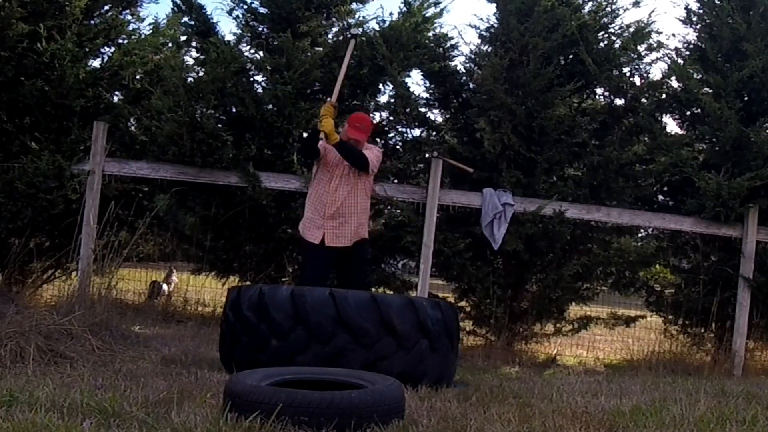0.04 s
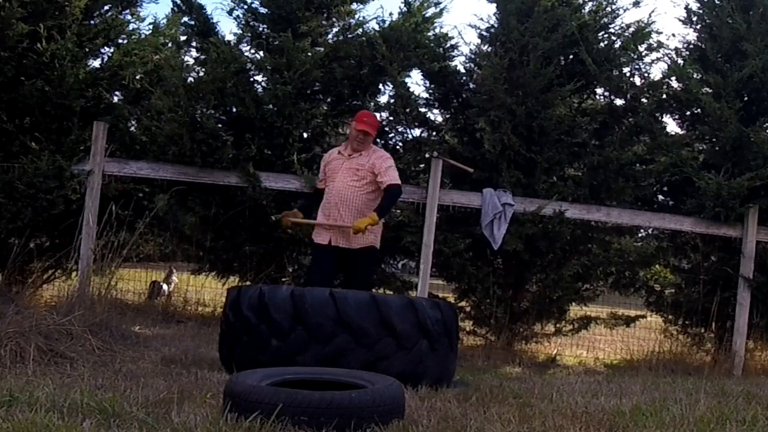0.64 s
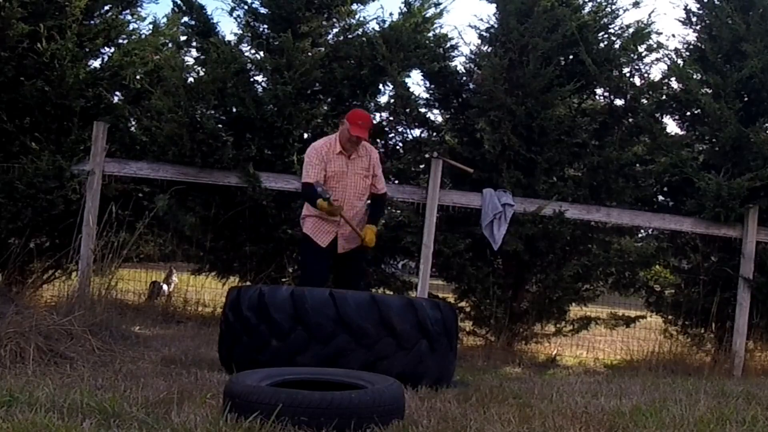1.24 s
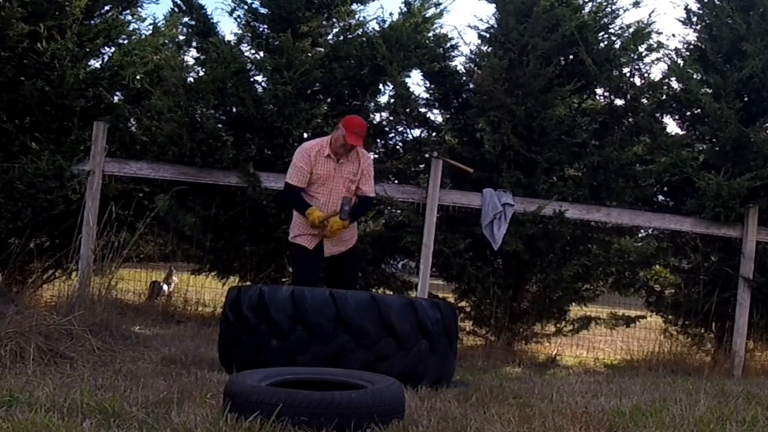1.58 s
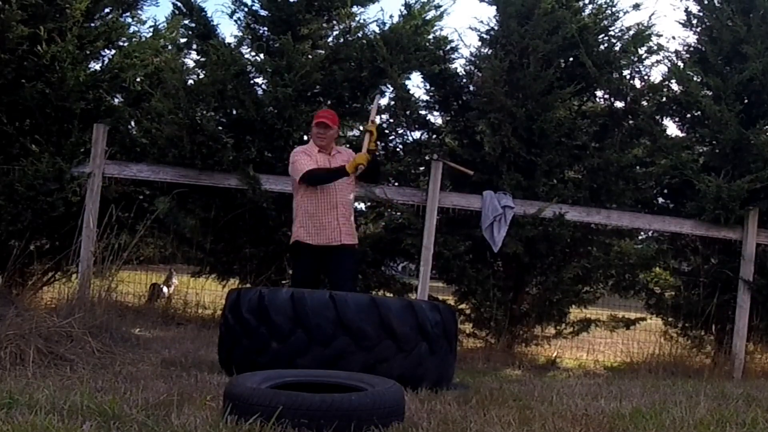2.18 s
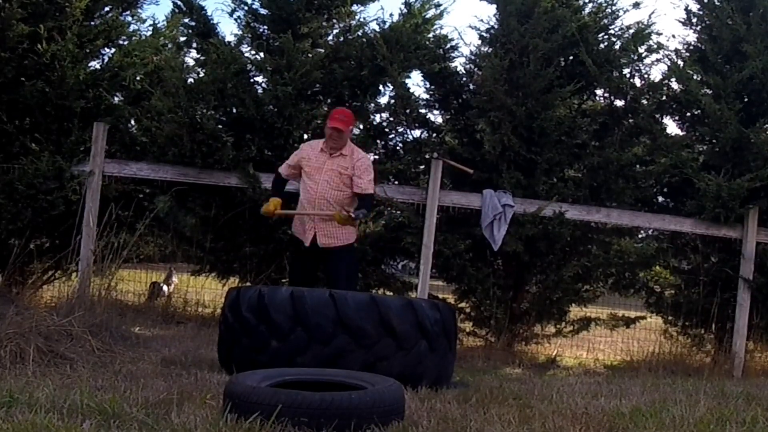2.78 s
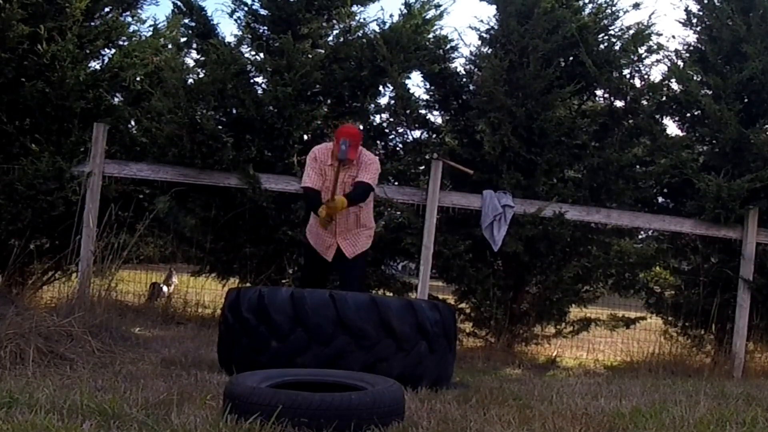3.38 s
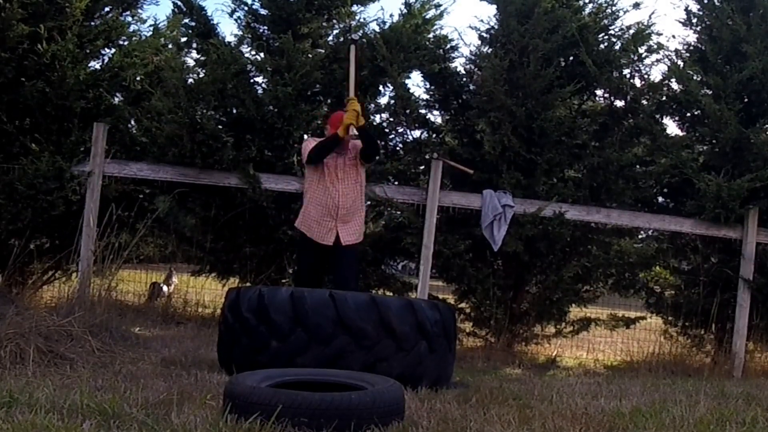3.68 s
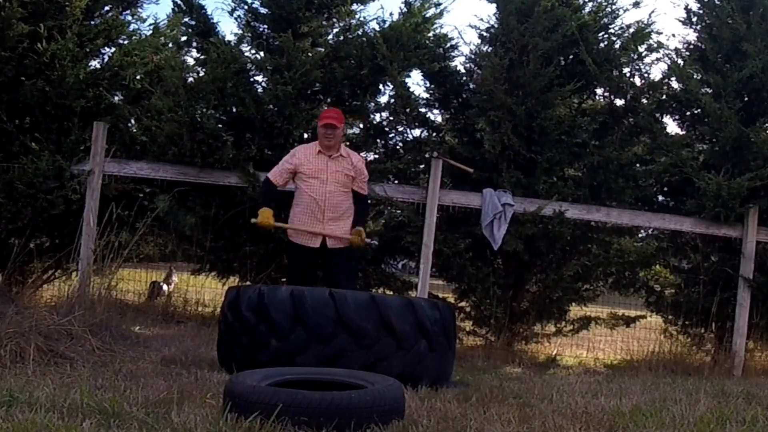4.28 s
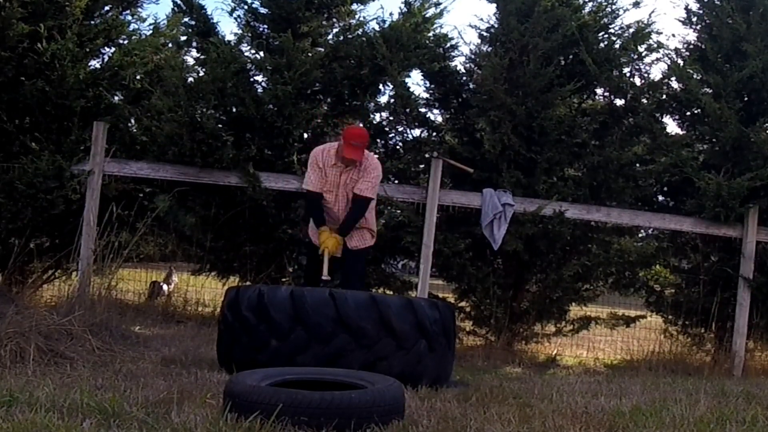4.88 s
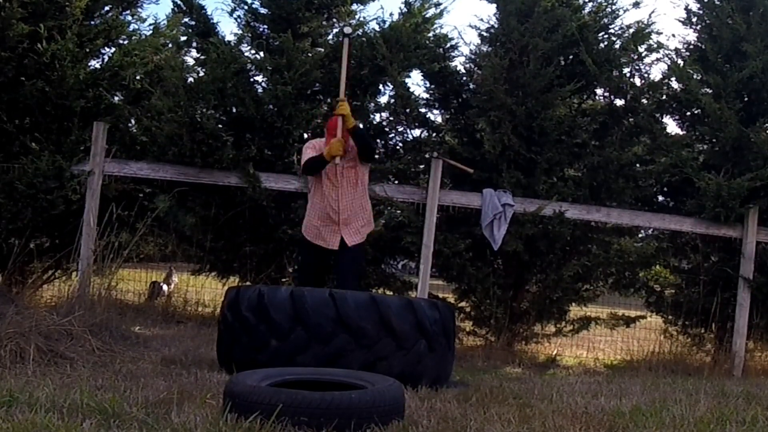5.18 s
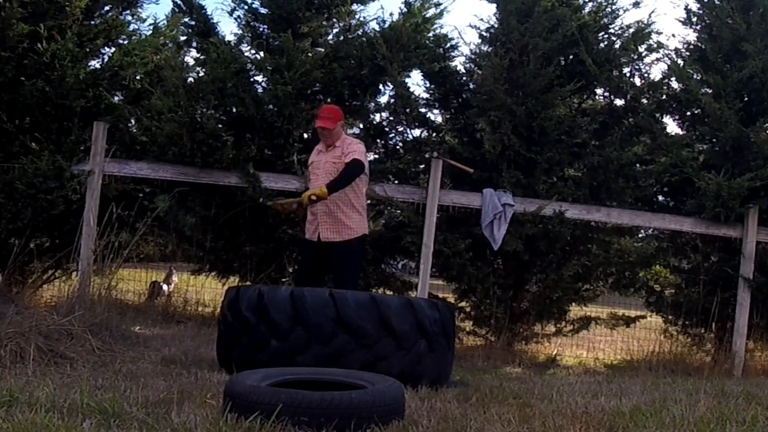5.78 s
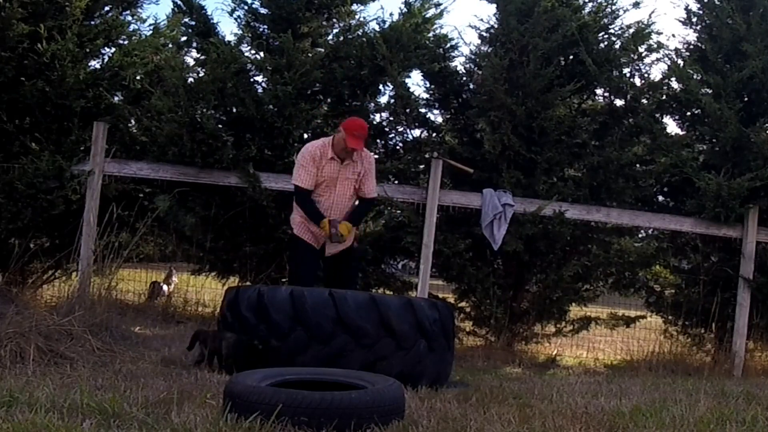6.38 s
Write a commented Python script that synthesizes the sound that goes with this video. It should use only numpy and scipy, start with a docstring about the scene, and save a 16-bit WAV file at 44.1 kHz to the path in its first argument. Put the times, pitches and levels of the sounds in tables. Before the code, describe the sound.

Outdoors, over a soft hiss of trees, a heavy hammer hits a large rubber tire again and again at a quick, even pace. The hollow thuds vary in strength, some booming and a few cracking sharply, with small dry ticks and clinks among them. A gust rumbles on the microphone partway through and fades. Faint birds chirp around a short pause before the last two blows.

```python
"""Sledgehammer on a tractor tire.

Quick, steady blows in a grassy yard: the carcass thuds, the rubber slaps, the ground booms.
Four land with a hard crack; handling adds light clinks, and soft rubs fall between blows.
Wind buffets the microphone midway, trees hiss, small birds chirp, thin ticks come and go."""
import sys
import numpy as np
from scipy import signal
from scipy.fft import rfft, irfft, next_fast_len
from scipy.io import wavfile
from scipy.ndimage import uniform_filter1d, map_coordinates

SR = 44100
rng = np.random.default_rng(int(sys.argv[2]) if len(sys.argv) > 2 else 0)


def wav_record(signal):
    """Record a signal, one row per channel, as 16-bit PCM in the file named by sys.argv[1]."""
    frames = np.transpose(np.atleast_2d(signal))
    bounded = np.clip(frames, -1, 1)
    # unit amplitude maps onto the largest positive 16-bit level
    quanta = np.round(bounded * 32767).astype(np.int16)
    wavfile.write(sys.argv[1], SR, quanta)


N = 293265

# low spectrum of wind flutter and soft bumps: freq_hz, gain_db
FLUTTER_SPECTRUM = [(70, -21), (130, 3.5), (220, 4.5), (320, -5), (450, -13), (650, -33), (1000, -32),
                    (2000, -65)]


def amp(db):
    """Decibels to gain."""
    return 10 ** (np.asarray(db) / 20)


def unit(x):
    """x at rms 1."""
    return x / np.sqrt(np.mean(x ** 2) + 1e-20)


def coloured(x, spectrum):
    """x filtered by a curve of (freq_hz, gain_db) points."""
    size = next_fast_len(len(x) + 4096)
    hz, db = np.transpose(spectrum)
    bin_hz = np.fft.rfftfreq(size, 1 / SR)
    gain = amp(np.interp(np.log(bin_hz + 1), np.log(hz), db))
    return irfft(rfft(x, size) * gain, size)[:len(x)]


def noise(spectrum, size):
    """Coloured noise at rms 1."""
    return unit(coloured(rng.standard_normal(size), spectrum))


def burst(spectrum, envelope):
    """Enveloped noise with the energy of its envelope."""
    return unit(noise(spectrum, len(envelope)) * envelope) * np.sqrt(np.mean(envelope ** 2))


def wobble(rate_hz):
    """Smooth random curve, rate_hz knots a second."""
    knots = rng.standard_normal(int(N * rate_hz / SR) + 4)
    return map_coordinates(knots, [np.arange(N) * rate_hz / SR])


def add(track, start_s, sound):
    """Mix a sound into the track."""
    start = max(round(start_s * SR), 0)
    track[start:start + len(sound)] += sound[:len(track) - start]


def blunt(t, rise_s, hold_s, fall_s, tail_db, t60_s):
    """Impact envelope: brief hold, then a fast drop to a dying tail."""
    late_s = np.maximum(t - hold_s, 0)
    tail = amp(tail_db - 60 * late_s / t60_s)
    return np.clip(t / rise_s, 0, 1) * np.maximum(np.exp(-late_s / fall_s), tail)


def partial(freq_hz, rms_db, t):
    """One undamped mode, slightly detuned, at random phase."""
    detuned_hz = freq_hz * (1 + rng.normal(0, 0.0038))
    return amp(rms_db) * np.sqrt(2) * np.sin(2 * np.pi * (detuned_hz * t + rng.random()))


def struck(modes, t):
    """Damped modes excited together."""
    return sum(amp(db - 60 * t / t60_s) * np.sin(2 * np.pi * hz * t) for hz, db, t60_s in modes)


def wind():
    """Air rumbles on the microphone; the strongest eddies also flutter higher up."""
    # wind strength: time_s, level_db
    strength = [(0.0, -51.5), (0.57, -40.5), (1.0, -46), (1.94, -45), (2.11, -27), (2.52, -30), (2.68, -27),
                (2.93, -25.5), (3.22, -29.5), (3.46, -26.5), (3.83, -36), (4.31, -45.5), (5.22, -45.5),
                (5.45, -38), (5.72, -49), (5.95, -57), (6.18, -39.5), (6.65, -44)]
    # air rumble: freq_hz, gain_db
    rumble_spectrum = [(10, -2.5), (28, 1.5), (65, -0.5), (110, -3.5), (170, -9), (280, -26.5), (500, -52),
                       (1200, -82.5)]
    # strongest eddies: centre_s, rumble_db, flutter_db
    buffets = [(2.011, -16, -20.5), (2.049, -15.5, -28), (2.222, -17.5, -43), (2.265, -17, -19),
               (2.492, -17, -27.5), (2.556, -14.5, -26.5), (2.645, -19.5, -48), (2.835, -16, -34),
               (2.978, -15.5, -23.5)]
    time_s, level_db = np.transpose(strength)
    mean_db = np.interp(np.arange(N) / SR, time_s, level_db)
    eddy_db = 4 * wobble(rate_hz=12)
    out = amp(mean_db + eddy_db) * noise(rumble_spectrum, N)
    buffet_s = 0.064
    swell = signal.windows.tukey(int(buffet_s * SR), 0.7)
    for centre_s, rumble_db, flutter_db in buffets:
        rumble = amp(rumble_db) * burst(rumble_spectrum, swell)
        flutter = amp(flutter_db) * burst(FLUTTER_SPECTRUM, swell)
        add(out, centre_s - buffet_s / 2, rumble + flutter)
    return out


def trees():
    """Conifers hiss softly, drifting in faint patches of time and frequency."""
    # foliage hiss: freq_hz, gain_db
    hiss_spectrum = [(70, -21), (115, -6.5), (165, 3), (215, 0), (380, -9), (900, -10.5), (1200, -16),
                     (1800, -17), (2800, -25.5), (3600, -28.5), (4300, -35.5), (9000, -38), (14000, -33),
                     (16000, -47)]
    level_db, patch_db = -40, 1.9
    bins = signal.stft(noise(hiss_spectrum, N), nperseg=512)[2]
    patches = uniform_filter1d(rng.standard_normal(bins.shape), size=6, axis=0)
    patches = uniform_filter1d(patches, size=12, axis=1)
    hiss = signal.istft(bins * amp(patch_db * unit(patches)), nperseg=512)[1][:N]
    return amp(level_db) * unit(hiss)


def blows():
    """The carcass rings and heaves on the ground; rubber slaps and scuffs the head; the handle rings."""
    # hammer blows: start_s, hold_s, thud_db, slap_db, boom_db
    strikes = [(0.107, 0.031, -29, -33, -30), (0.45, 0.031, -8.5, -25.5, -19.5),
               (0.825, 0.036, -20.5, -33.5, -20.5), (1.167, 0.036, -11, -38, -34),
               (1.512, 0.033, -7.5, -26.5, -17.5), (1.919, .035, -8.5, -27, -17.5),
               (2.294, 0.034, -14.5, -31.5, -13.5), (2.673, 0.028, -20, -37.5, -29),
               (3.028, .019, -13, -25, -8), (3.39, 0.035, -13.5, -26.5, -26),
               (3.767, 0.037, -26, -40, -18.5), (4.143, 0.0326, -23, -38.5, -21.5),
               (4.521, .035, -21, -41.5, -21), (4.86, 0.032, -12, -30.5, -17.5),
               (5.237, 0.036, -15.5, -40, -33), (5.988, 0.035, -22.5, -35.5, -28),
               (6.331, .036, -9.5, -23.5, -22.5)]
    # carcass modes: freq_hz, gain_db, knock_share (0 follows the thud, 1 the knock)
    tire_modes = [(132, -35.5, 0.1), (173, 2.5, 0.05), (222.1, -16, 0.04), (280, -7.5, 0.11),
                  (380, -7.5, 0.87), (422.2, -7.5, 0.91), (517.3, -6, 1), (613.4, -15.5, 1)]
    # hammer and handle modes: freq_hz, gain_db
    handle_modes = [(982, -12.5), (1170, -19.5), (1250, -15.5), (1430, -15), (1590, -21), (2000, -17.5),
                    (2210, -19)]
    # tire on the ground: freq_hz, gain_db
    boom_spectrum = [(20, -32), (45, -10.5), (72, 13), (100, -11.5), (150, -70.5), (400, -69.5)]
    # rubber slap: freq_hz, gain_db
    slap_spectrum = [(200, -6.5), (450, 4), (800, -0.5), (1500, -1), (2100, -0.5), (2700, -10.5),
                     (3800, -16.5), (6000, -34.5), (10000, -58)]
    # rubber scuff: freq_hz, gain_db
    scuff_spectrum = [(1500, -3.5), (2600, -4), (3500, 4), (4300, -1), (5400, 0), (6500, -8.5), (8000, -37),
                      (11000, -23.5), (16000, -39)]
    full_thud_db, full_slap_db, full_knock_db, full_scuff_db = -10, -25.5, -22, -40  # at full swing
    out, t = np.zeros(N), np.arange(SR // 4) / SR
    for start_s, hold_s, thud_db, slap_db, boom_db in strikes:
        body_env = blunt(t, rise_s=0.0046, hold_s=hold_s, fall_s=0.0019, tail_db=-13.5, t60_s=0.18)
        ground_env = blunt(t, rise_s=0.0092, hold_s=hold_s, fall_s=0.0046, tail_db=-14, t60_s=0.23)
        skin_env = blunt(t, rise_s=0.0047, hold_s=hold_s, fall_s=0.001, tail_db=-10.5, t60_s=0.19)
        # harder blows favour the upper modes, the knock
        knock_db = full_knock_db + 1.64 * (thud_db - full_thud_db) + (slap_db - full_slap_db)
        scuff_db = full_scuff_db + 0.61 * (slap_db - full_slap_db)
        carcass = np.zeros(len(t))
        for freq_hz, gain_db, knock_share in tire_modes:
            spot_db = gain_db * rng.normal(1, 0.21)  # each blow lands on another spot
            drive_db = thud_db + knock_share * (knock_db - thud_db)
            carcass += partial(freq_hz, spot_db + drive_db, t)
        handle = sum(partial(hz, db + slap_db + rng.normal(0, 1.5), t) for hz, db in handle_modes)
        boom = amp(boom_db) * burst(boom_spectrum, ground_env)
        slap = amp(slap_db) * burst(slap_spectrum, skin_env)
        scuff = amp(scuff_db) * burst(scuff_spectrum, skin_env)
        add(out, start_s, carcass * body_env + handle * skin_env + boom + slap + scuff)
    return out


def ticks():
    """Thin, dry ticks, each one bright spike; fainter ones fall at random during the gust."""
    # loudest ticks: start_s, impulse_db
    loud = [(.4826, -6.5), (1.2011, -9), (1.5432, -6), (2.0217, -7), (2.1928, -14.5), (2.2612, -17.5),
            (2.5006, -10.5), (2.6717, -16.5), (2.9795, -16), (3.8002, -12), (4.5186, -11.5), (6.3653, -9.5)]
    # tick colour: freq_hz, gain_db
    tick_spectrum = [(500, -35), (2000, -3), (4000, 1.5), (7000, -9.5), (9000, -13), (10500, 3),
                     (12000, -4.5), (14000, 9), (16000, -1)]
    faint_s = rng.uniform(2.2, 3.6, size=6)
    faint_db = rng.normal(-23.5, 5, size=6)
    impulses = np.zeros(N)
    for start_s, impulse_db in [*loud, *zip(faint_s, faint_db)]:
        add(impulses, start_s, amp([impulse_db]))
    return coloured(impulses, tick_spectrum)


def birds():
    """Small, distant birds: each chirp is a short whistle that glides and bends."""
    # chirps: start_s, centre_hz, glide_oct, bend_oct, level_db
    chirps = [(.555, 4170, 0.14, .15, -51), (5.419, 3630, -.05, 0.032, -51),
              (5.781, 3500, -.55, -0.12, -47), (6.224, 3320, -.42, -0.11, -45),
              (6.266, 3100, -.28, -.02, -53), (6.526, 3480, -.35, -.06, -52),
              (6.562, 3470, -0.39, -.06, -50.5)]
    chirp_s = 0.035
    out, position = np.zeros(N), np.linspace(-1, 1, int(chirp_s * SR))
    envelope = np.cos(np.pi * position / 2)
    for start_s, centre_hz, glide_oct, bend_oct, level_db in chirps:
        pitch_hz = centre_hz * 2 ** (glide_oct * position / 2 + bend_oct * position ** 2)
        whistle = np.sin(2 * np.pi * np.cumsum(pitch_hz) / SR)
        add(out, start_s, amp(level_db) * envelope * whistle)
    return out


def cracks():
    """The head lands hard: a brief, bright crack and clack on one low push of the tread."""
    # hard contacts: start_s, hold_s, crack_db, push_db, clack_db
    contacts = [(1.5149, 0.0026, -6, -14, -10.5), (3.0328, 0.0025, -6, -21, -5.5),
                (4.519, 0.0019, -10.5, -4, -14), (5.989, 0.0028, -5.5, -2, -24.5)]
    # contact noise: freq_hz, gain_db
    crack_spectrum = [(200, -22), (550, 16), (850, -12.5), (1200, 4), (1600, 5), (2300, 2.5), (3500, -7.5),
                      (5000, -19), (8000, -40.5), (16000, -28.5)]
    # contact ring: freq_hz, gain_db, t60_s
    contact_modes = [(347, 4.5, 0.02), (575, 2.5, 0.017), (896, -2.5, 0.011), (1020, 3.5, 0.0047),
                     (1920, -7, 0.02), (2730, -14.5, 0.01), (3540, -17.5, 0.018), (5150, -35, 0.006)]
    push_hz, clack_hz = 170, 1500
    push_centre_s, push_decay_s, push_delay_s = 0.02, 0.0048, 0.0019
    out, t = np.zeros(N), np.arange(SR // 20) / SR
    from_peak_s = t - push_centre_s
    push = -np.cos(2 * np.pi * push_hz * from_peak_s) * np.exp(-np.abs(from_peak_s) / push_decay_s)
    for start_s, hold_s, crack_db, push_db, clack_db in contacts:
        snap_env = blunt(t, rise_s=0.00034, hold_s=hold_s, fall_s=0.00044, tail_db=-35, t60_s=0.04)
        crack = amp(-4.5) * burst(crack_spectrum, snap_env) - struck(contact_modes, t)
        clack = -np.sin(2 * np.pi * clack_hz * t) * snap_env
        add(out, start_s, amp(crack_db) * crack + amp(clack_db) * clack)
        add(out, start_s + push_delay_s - push_centre_s, amp(push_db) * push)
    return out


def clinks():
    """Light, bright contacts as the hammer is handled."""
    # handling contacts: start_s, gain_db
    contacts = [(2.6975, -13), (3.4552, -29), (3.7683, -26.5), (4.173, -23.5), (4.753, -30)]
    # clink modes: freq_hz, gain_db, t60_s
    clink_modes = [(1820, -17, 0.022), (2590, -1, 0.0039), (3700, -2, 0.0051), (5380, -8.5, 0.0065),
                   (5400, -8.5, 0.0038)]
    rise_s = 0.00051
    out, t = np.zeros(N), np.arange(SR // 20) / SR
    clink = struck(clink_modes, t) * np.clip(t / rise_s, 0, 1)
    for start_s, gain_db in contacts:
        add(out, start_s, amp(gain_db) * clink)
    return out


def rubs():
    """Soft, low bumps with a dry rasp, perhaps the grip shifting on the handle."""
    # rubs between blows: start_s, length_s, bump_db, rasp_db
    shifts = [(3.179, 0.083, -24.5, -43), (5.652, 0.028, -31.5, -68), (5.686, 0.025, -24.5, -54)]
    # dry rasp: freq_hz, gain_db
    rasp_spectrum = [(900, -15), (1600, -4), (2250, -7), (2550, 4), (3100, -16), (3700, -17), (4400, -9),
                     (5400, -24), (8000, -45)]
    out = np.zeros(N)
    for start_s, length_s, bump_db, rasp_db in shifts:
        swell = signal.windows.tukey(int(length_s * SR), 0.6)
        bump = amp(bump_db) * burst(FLUTTER_SPECTRUM, swell)
        rasp = amp(rasp_db) * burst(rasp_spectrum, swell)
        add(out, start_s, bump + rasp)
    return out


def scene():
    """All sources, one channel."""
    return (wind() + trees() + blows() + ticks() + birds() + cracks() + clinks() + rubs())[None]


def record(dry):
    """Soft clip of the highest peaks, narrow treble dip, band limit."""
    ceiling, top_hz = 1.02, 16200
    dip_hz, dip_width_hz, dip_db = 8300, 400, -9
    clipped = dry / (1 + np.abs(dry / ceiling) ** 8) ** (1 / 8)
    hz = np.fft.rfftfreq(N, 1 / SR)
    dip = amp(dip_db * np.exp(-((hz - dip_hz) / dip_width_hz) ** 2))
    return irfft(rfft(clipped) * dip * (hz < top_hz), N)


dry = scene()
out = record(dry)
wav_record(out)
```